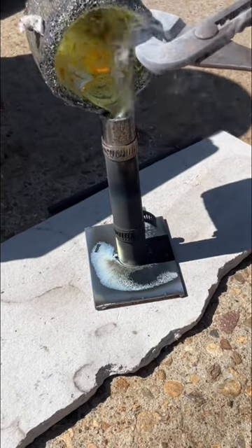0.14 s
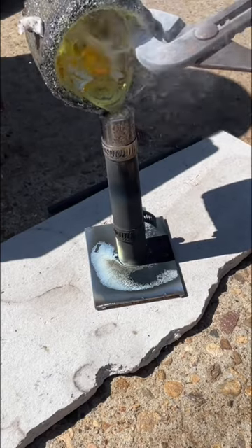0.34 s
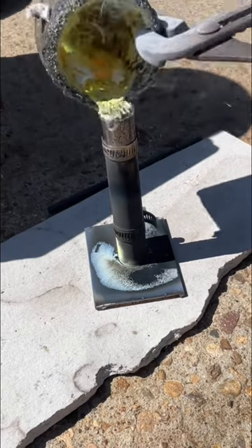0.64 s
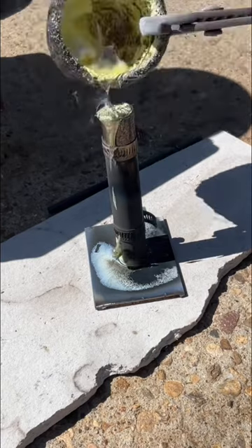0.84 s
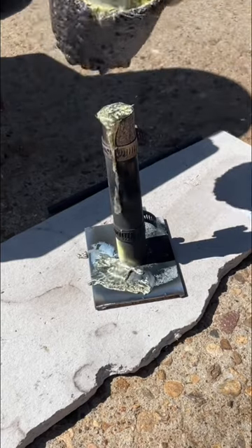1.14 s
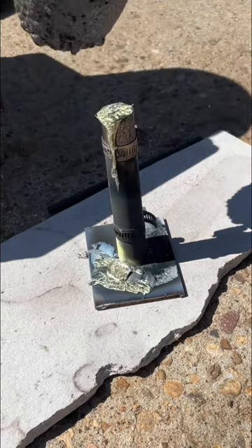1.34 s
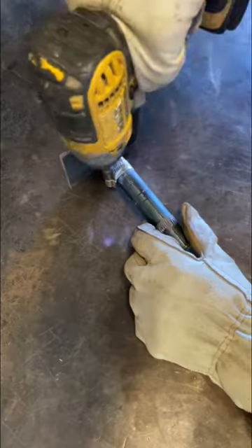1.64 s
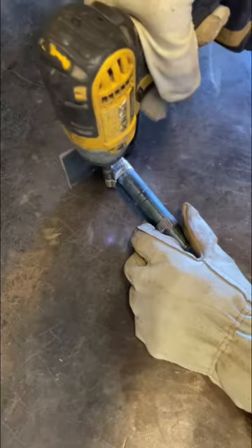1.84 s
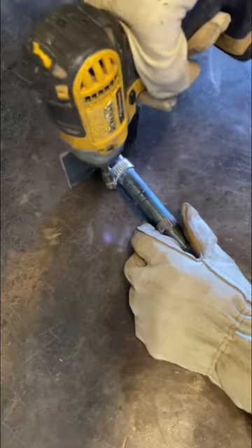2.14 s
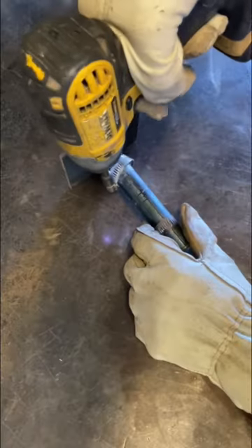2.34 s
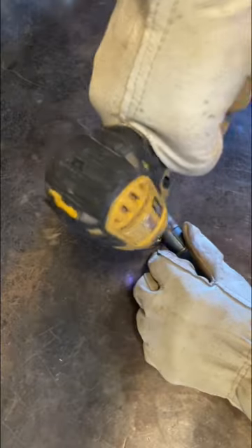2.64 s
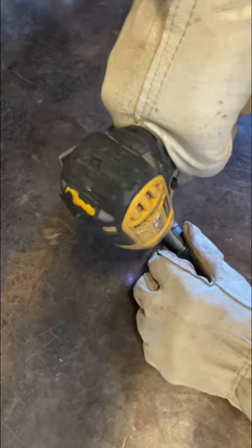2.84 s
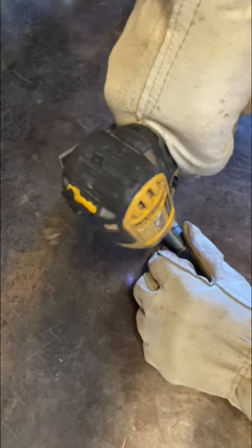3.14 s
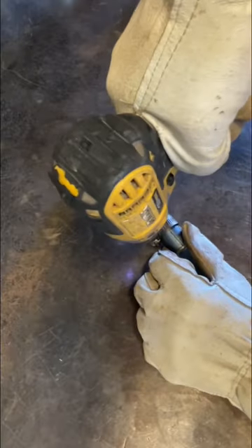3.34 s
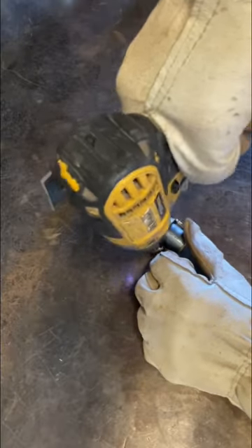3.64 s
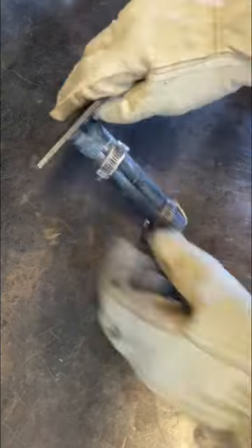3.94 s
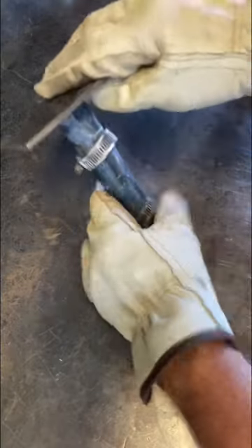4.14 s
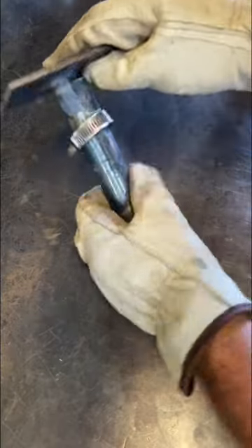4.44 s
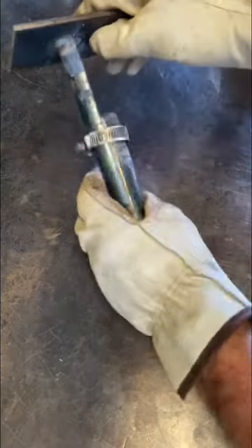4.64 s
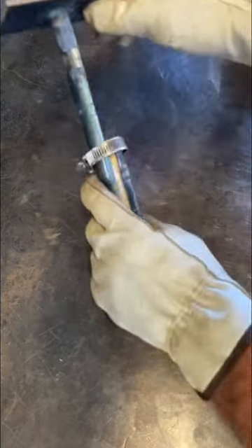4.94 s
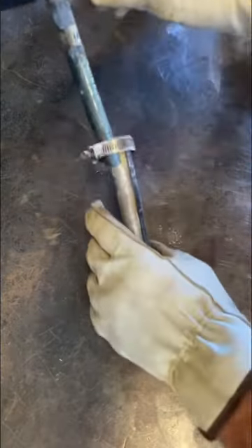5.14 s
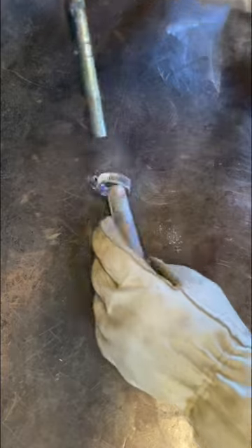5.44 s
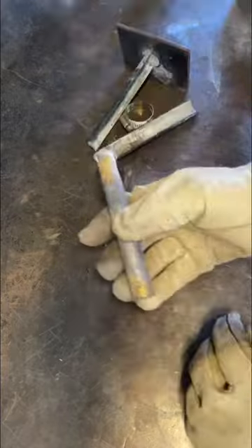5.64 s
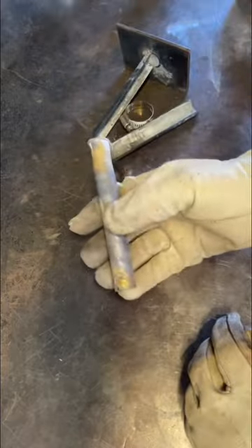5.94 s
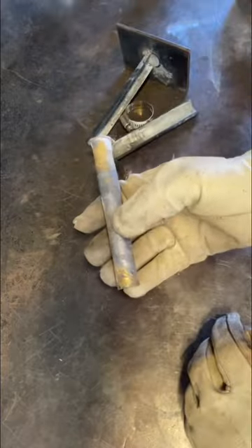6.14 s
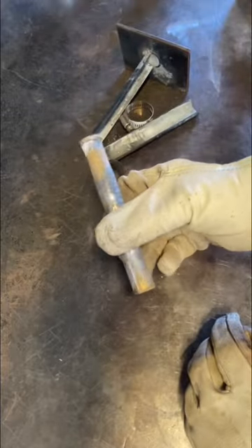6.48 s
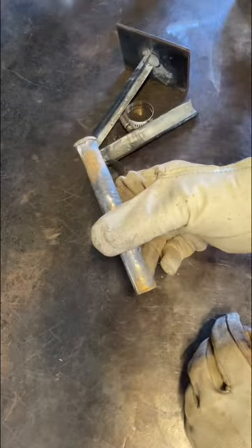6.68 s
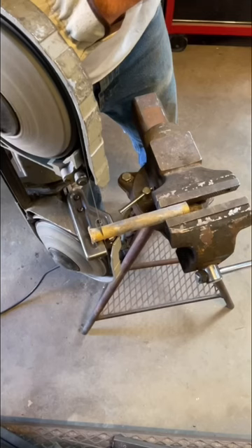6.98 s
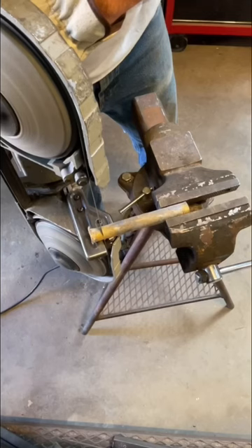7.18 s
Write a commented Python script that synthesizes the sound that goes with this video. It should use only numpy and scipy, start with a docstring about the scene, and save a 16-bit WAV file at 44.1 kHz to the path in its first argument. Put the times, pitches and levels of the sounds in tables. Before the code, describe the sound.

A quiet yard with a low beating hum and tiny metallic ticks cuts to an echoing workshop. A cordless driver whirs up and stops, steel clatters on a bench, and a second shorter driver burst follows with sharp knocks. Metal grinds, squeaks and slides apart with a heavy clank, then soft glove rustles in near quiet before a band saw cuts in loudly. Close, wide stereo microphone, no speech.

```python
"""A yard, then a workshop, in six short scenes joined by quick fades. In the yard, tongs and cooling slag tick
as dying noise puffs over a beating hum. In the workshop a cordless driver backs off two hose clamps with
wavering gear tones, a steel mould is knocked and slid off a cast bar as noise bursts and grit ring its modes,
gloves rustle as grainy noise, and a band saw runs as wide noise with tones. A two-port microphone hears bass
in both ports alike and the highest treble mostly in opposite phase."""
import sys
import numpy as np
from scipy import signal
from scipy.fft import rfft, irfft, next_fast_len
from scipy.io import wavfile
from scipy.ndimage import uniform_filter1d

SR = 44100
rng = np.random.default_rng(int(sys.argv[2]) if len(sys.argv) > 2 else 0)


def wav_out(sig):
    """Save sig, one row per channel (or a flat mono array), as 16-bit PCM at SR to the path in sys.argv[1]."""
    wavfile.write(sys.argv[1], SR, np.round(np.clip(np.atleast_2d(sig).T, -1, 1) * 32767).astype(np.int16))


N = 322371
T = np.arange(N) / SR  # time in seconds


def amp(db):
    """Turns decibels into a linear gain."""
    return 10 ** (np.asarray(db) / 20)


def evened(x):
    """Scales a signal to an rms of 1."""
    return x / np.sqrt(np.mean(x ** 2) + 1e-20)


def read(points, hz, axis=1):
    """Reads one column of a table between its points, along log frequency."""
    table = np.array(points, float)
    return np.interp(np.log(hz + 1), np.log(table[:, 0] + 1), table[:, axis])


def columns(rows):
    """Start sample and the columns of a time table at sample rate."""
    s, *rest = np.transpose(rows)
    t = T[round(s[0] * SR):round(s[-1] * SR)]
    return round(s[0] * SR), [np.interp(t, s, c) for c in rest]


def add(mix, at, sound):
    """Lays a sound into the mix from sample at, cut off at the end of the mix."""
    part = mix[at:at + len(sound)]
    part += sound[:len(part)]


def coloured(x, spectrum, band):
    """Filters x by a spectrum scaled so that white noise keeps rms 1 inside the band."""
    size = next_fast_len(x.shape[-1] + 2048)
    hz = np.fft.rfftfreq(size, 1 / SR)
    gain = amp(read(spectrum, hz))
    in_band = (hz > band[0]) * (hz < band[1])
    gain = gain / np.sqrt(np.mean(gain ** 2 * in_band))
    return irfft(rfft(x, size) * gain, size)[..., :x.shape[-1]]


def grainy(size, rough_db, grain):
    """White noise whose strength jumps about from grain to grain (grain in seconds)."""
    steps, noise = rng.standard_normal((2, -(-size // SR) * SR))
    jumps = evened(uniform_filter1d(steps, max(int(grain * SR), 1)))
    return evened(noise * amp(rough_db * jumps))[:size]


def resonate(x, hz, width):
    """Shifts the curve hz down to zero, smooths, and shifts back: a resonance of gain 1."""
    turn = np.exp(2j * np.pi * np.cumsum(hz * np.ones(len(x))) / SR)
    r = np.exp(-np.pi * width / SR)
    return 2 * (turn * signal.lfilter([1 - r], [1, -r], x / turn)).real


# The six scenes. Each row: start in seconds, fade in and fade out in seconds, echo level in dB,
# air level in dB, steady low rumble in dB, rumble centre in Hz.
SCENES = [(0, 0.013, .02, -29, -63, -90, 80), (1.512, 0.016, 0.042, -16.5, -61, -48.5, 115),
          (2.582, 0.017, 0.037, -7.5, -59, -53, 88), (3.98, 0.012, 0.035, -9.5, -53.5, -50, 78.5),
          (5.652, 0.022, 0.029, -18, -61, -57.5, 79), (6.975, 0.04, 0.00059, -12.5, -58, -59, 85)]


def scene_at(t):
    """Index of the scene that sounds at time t."""
    return np.searchsorted([row[0] for row in SCENES], t, "right") - 1


def swell(s, db, rise, fall):
    """Grows to its peak and dies away evenly in dB, inside its own scene."""
    out = np.zeros(N)
    edges = np.array([row[0] for row in SCENES] + [N / SR])
    inside = edges[scene_at(s):][:2]
    part = slice(*np.ceil(inside * SR).astype(int))
    out[part] = amp(db - 20 * np.maximum((s - T[part]) / rise, (T[part] - s) / fall))
    return out


# Colour of the yard air and of the workshop air. Each row: frequency in Hz, relative density in dB per Hz.
YARD = [(30, -12), (60, -12.5), (150, -12.5), (250, -26), (500, -29), (1000, -34.5), (2000, -42.5),
        (3000, -46), (5000, -46), (9000, -46.5), (15500, -63)]
SHOP = [(30, -11), (80, -2), (130, -11.5), (200, -15.5), (350, -17.5), (500, -13.5), (800, -7.5),
        (1100, -19), (1500, -28), (2500, -34.5), (4000, -55.5), (8000, -56), (15500, -67)]


def air():
    """Broad noise drawn apart for the two microphone paths, with the narrow layers alike in both."""
    air_db = np.transpose(SCENES)[4, scene_at(T)]
    yard = amp(air_db) * coloured(rng.standard_normal((2, N)), YARD, (300, 6000))
    shop = amp(air_db) * coloured(rng.standard_normal((2, N)), SHOP, (300, 6000))
    in_yard = T < SCENES[1][0]
    waver = 1 + 0.061 * evened(uniform_filter1d(rng.standard_normal(N), 1500))
    return np.where(in_yard, yard + hum(waver), shop + murmurs() + rumble(waver)) + buzz()


# Swell of the far hum. Each row: time in seconds, level in dB of the stronger machine.
HUM_DB = [(0, -50), (.12, -45), (.36, -40), (.62, -51), (.82, -41), (1.1, -41.5), (1.51, -43.5)]
HUM_HZ, BEAT_S, BEAT_TOP_S = 78.4, .234, .35  # centre pitch, beat period, time of one beat peak
WEAKER = .45  # strength of the second machine against the first


def hum(waver):
    """Two far machines hum a few Hz apart and beat."""
    turn = np.exp(2j * np.pi * np.cumsum(HUM_HZ * waver) / SR)
    beat = np.exp(1j * np.pi * (T - BEAT_TOP_S) / BEAT_S)
    pair = (turn * (beat + WEAKER / beat)).imag
    return amp(np.interp(T, *np.transpose(HUM_DB))) * np.sqrt(2) * pair


# A thin buzz that comes and goes. Each row: start and end in seconds, level in dB.
BUZZ = [(.05, .36, -68), (1.2, 1.62, -71), (4.0, 4.14, -71)]
BUZZ_HZ, BUZZ_FADE_S = 3880, .04


def buzz():
    """Narrow high noise faded in and out."""
    on = sum(amp(db) * np.clip(np.minimum(T - start, end - T) / BUZZ_FADE_S, 0, 1) for start, end, db in BUZZ)
    return on * evened(resonate(rng.standard_normal(N), BUZZ_HZ, 300))


# Small ticks of slag, tongs, clamp and bit. Each row: start in seconds, body level in dB, body pitch in Hz,
# bright click over body in dB.
TICKS = [(0.2763, -58, 2800, -4), (0.3974, -65, 1125, 15), (0.6065, -42, 1060, -4), (0.6275, -48, 1744, -5),
         (0.7194, -61, 1130, 4), (0.7711, -49.5, 2243, -24), (0.7844, -45, 1000, -21),
         (0.8784, -46.5, 1810, -4), (0.8924, -48, 1823, -4), (0.9009, -48.5, 1036, 5.5),
         (0.9184, -55, 1140, 7), (1.063, -45, 2433, 4.5), (1.5963, -59, 1140, -20), (1.6114, -59, 1600, 6),
         (1.6277, -46, 2070, .4), (1.6472, -37, 2270, -4), (1.9244, -61, 1240, -13),
         (1.931, -52, 2790, -11), (1.9924, -36, 3780, 3), (2.0043, -15.5, 3940, -.4),
         (2.3835, -19.5, 2180, -12), (2.5262, -59, 1310, -7), (2.6114, -49, 3930, 8.5),
         (3.0899, -45, 1185, -21), (3.1094, -59.5, 2240, 9), (3.7609, -32.5, 2140, -16),
         (4.357, -47, 1600, -20), (4.3725, -35, 1650, -13), (4.4184, -60, 1050, -6),
         (4.5974, -41.5, 2470, .1), (5.6794, -53, 1070, -11), (5.7494, -60, 1157, -14),
         (5.9788, -63, 1097, 9), (5.715, -52, 1300, -20), (6.0244, -60, 1033, -4), (6.1344, -67, 1000, 2.5),
         (6.5494, -70, 1100, .4), (6.0746, -54, 2350, -15), (6.2024, -60, 1305, -3),
         (6.7705, -64, 992, -30)]
# Colour of bright clicks and edges. Each row: frequency in Hz, relative density in dB per Hz.
SPARK = [(3000, -27), (5000, 2.5), (6500, -1), (9000, -9), (15500, -20.5)]
TICK_T60_S, CLICK_T60_S = .043, .016  # time to die by 60 dB


def ticks():
    """Each tick is a dying puff of noise around its body pitch with a bright click."""
    out, t = np.zeros(N), T[:4000]
    for (s, db, hz, bright_db), puff in zip(TICKS, rng.standard_normal((len(TICKS), 4000))):
        body = evened(resonate(resonate(puff, hz, 900), hz, 1500)) * amp(-60 * t / TICK_T60_S)
        click = evened(coloured(puff, SPARK, (4500, 8000))) * amp(bright_db - 60 * t / CLICK_T60_S)
        add(out, round(s * SR), amp(db) * (body + click))
    return out


def smear(near):
    """Short dense random smear, dying by 60 dB in 15 ms, that makes the second path differ from the first."""
    burst = rng.standard_normal(1500) * amp(-60 * T[:1500] / .015)
    return signal.oaconvolve(near, burst / np.linalg.norm(burst))[:N]


# Decay of the echo. Each row: frequency in Hz, time to die by 60 dB in seconds, relative level in dB.
ECHO = [(99.7, 1, -2.5), (503, 0.87, -2.5), (1504, 0.62, 2), (3000, 0.67, 3.5), (4530, 0.49, 5),
        (8000, 0.31, 2), (13880, 0.36, -3.5)]


def echo_tails():
    """Sparse taps of random sign, each band dying at its own speed, other taps for each path."""
    taps = np.zeros((2, SR))
    at = np.arange(200, SR - 20, 20) + rng.integers(0, 20, (2, (SR - 201) // 20))
    np.put_along_axis(taps, at, rng.choice([-1., 1.], at.shape), 1)
    hz, t, z = signal.stft(taps, SR, nperseg=256)
    early_db = -60 * t / read(ECHO, hz)[:, None]
    # a weaker, slower tail from the far end of the room takes over late
    decay = amp(early_db) + amp(0.58 * early_db - 18)
    level = amp(read(ECHO, hz, axis=2)[:, None])
    tail = signal.istft(z * level * decay, SR, nperseg=256)[1]
    return tail / np.linalg.norm(tail[0])


# Leather gloves and tongs rubbing steel. Each row: peak in seconds, level in dB,
# seconds to rise 20 dB, seconds to fall 20 dB.
RUBS = [(.62, -64, .08, .06), (.79, -66, .04, .08), (.89, -64, .03, .06), (.97, -68, .12, .06),
        (1.6, -52, .008, .01), (1.652, -54, .08, .02), (1.72, -59, .2, .33), (1.948, -53, .043, .04),
        (2.44, -48, .05, .1), (2.54, -41.5, .06, .032), (2.635, -41, .028, .02), (3.16, -54, .06, .1),
        (3.21, -44.5, .07, .03), (3.576, -44, .03, .24), (3.762, -36, .008, .015),
        (3.802, -38.5, .045, .035), (3.83, -50, .05, .2), (4.162, -55, .13, .1), (4.374, -49, .07, .015),
        (4.43, -57, .03, .06), (5.71, -64, .12, .07), (5.982, -64, .01, .008), (6.076, -67, .035, .02),
        (6.202, -72, .01, .3)]
# Colour of the rubbing. Each row: frequency in Hz, relative density in dB per Hz.
LEATHER = [(200, -25), (700, 7), (1200, -1), (2200, -1.5), (3400, -6.5), (6300, -7.5), (8500, -16),
           (15500, -21)]


def gloves():
    """Grainy friction noise under each rub."""
    strength = sum(swell(*row) for row in RUBS)
    return coloured(strength * grainy(N, 2.6, .003), LEATHER, (1500, 7000))


# Modes of the tongs. Each row: frequency in Hz, relative level in dB, time to die by 60 dB in seconds.
TONG = [(2370, -4, 0.08), (3610, -27, 0.14), (4680, -5, 0.027), (5443, -43, 0.35), (8204, -22, 0.051)]
TONG_S, TONG_DB = 1.063, -29.5


def tong_ring():
    """The tongs ring once: a handful of steel modes, each dying at its own speed."""
    out, t = np.zeros(N), T[:4000]
    ring = sum(amp(db - 60 * t / t60) * np.sin(2 * np.pi * hz * t) for hz, db, t60 in TONG)
    add(out, round(TONG_S * SR), amp(TONG_DB) * ring)
    return out


# The low rumble swells when the bench is shaken, pressed or struck. Each row: peak in seconds, level in dB,
# centre in Hz, seconds to rise 20 dB, seconds to fall 20 dB.
SWELLS = [(2.14, -32, 100, .2, .15), (2.25, -33, 115, .08, .1), (2.5, -42, 112, .1, .07),
          (2.675, -29.5, 96, .07, .12), (2.77, -37, 98, .1, .1), (2.93, -43, 98, .15, .2),
          (3.3, -40, 98, .1, .2), (3.64, -44, 86, .15, .2), (3.9, -44, 81, .3, .1), (4.1, -52, 78, .1, .1),
          (4.78, -34, 99, .13, .22), (5.08, -46, 111, .1, .15), (5.27, -39, 120, .07, .03),
          (5.345, -25, 123, .02, .08), (5.56, -29, 90, .13, .11), (6.02, -55, 78, .08, .08),
          (6.51, -53, 92, .07, .06)]


def rumble(waver):
    """A wavering drone and narrow low noise, whose centre leans toward the strongest swell."""
    low_db, low_hz = np.transpose(SCENES)[5:, scene_at(T)]
    level, weighted = amp(low_db), amp(low_db) * low_hz
    for s, db, hz, rise, fall in SWELLS:
        push = swell(s, db, rise, fall)
        level, weighted = level + push, weighted + push * hz
    hz = weighted / level
    drone = np.sin(2 * np.pi * np.cumsum(hz * waver) / SR)
    noise = evened(resonate(resonate(rng.standard_normal(N), hz, 52), hz, 90))
    return level * (0.57 * drone + .75 * noise)


# Narrow bands in the workshop air. Each row: frequency in Hz, level in dB before it drifts.
MURMURS = [(640, -76.5), (800, -75), (980, -72.5)]


def murmurs():
    """Narrow bands of the workshop air swell and fade."""
    out = np.zeros(N)
    for hz, db in MURMURS:
        slow = uniform_filter1d(uniform_filter1d(rng.standard_normal(N), 5000), 3000)
        drift = amp(4.0 * evened(slow))
        out += amp(db) * drift * evened(resonate(rng.standard_normal(N), hz, 50))
    return out


# Driver trigger half pressed. Each row: start and end in seconds, level in dB.
WHINES = [(1.983, 2.0, -44), (2.597, 2.645, -50), (3.138, 3.22, -46)]
# Partials of the controller whine. Each row: frequency in Hz, relative level in dB.
CHOP = [(3930, 0), (7860, -2), (11790, -6)]


def controller_whine():
    """The motor controller whines with steady harmonic partials."""
    out = np.zeros(N)
    for start, end, db in WHINES:
        t = T[:round((end - start) * SR)]
        whine = sum(amp(db + d) * np.sin(2 * np.pi * hz * t) for hz, d in CHOP)
        add(out, round(start * SR), whine * np.minimum(t / 0.0045, 1))
    return out


def gear_tone(hz, width, clean):
    """A steady partial on the speed curve, mixed with narrow noise around it."""
    steady = np.sqrt(2) * np.sin(2 * np.pi * np.cumsum(hz) / SR)
    rough = evened(resonate(grainy(len(hz), 2.1, 0.023), hz, width))
    return clean * steady + np.sqrt(1 - min(clean, 1) ** 2) * rough


# Driver runs. Each row: start and end in seconds, rise in seconds, time in seconds when the gears bite,
# spin-up time constant in seconds, gear noise in dB, base shaft hum in dB, base mesh tone in dB,
# clean share of the mesh tone, rattle depth in dB, change of the gear noise in dB per second.
RUNS = [(1.99, 2.45, .035, 2.012, .047, -22.5, -27, -24, .75, 1.5, -7),
        (3.215, 3.57, .008, 3.218, .055, -25, -38, -25, .35, 1.9, .1)]
# Tones along every run. Each row: share of the run, mesh tone over its base in dB, second tone in dB,
# third tone in dB, shaft hum over its base in dB.
TONES = [(0, -30, -40, -56, -18), (.08, -2.5, -31, -38, -8), (.15, -3.5, -27, -30, -3),
         (.33, -3.5, -23, -30, 0.1), (.47, -5, -28, -27, -1.5), (.62, .1, -32, -27, -3.5),
         (.8, -12, -32, -33, -4), (1, -43, -52, -59, -12)]
# Colour of the gear noise. Each row: frequency in Hz, relative density in dB per Hz.
GEARS = [(40, 0), (80, 3.7), (130, -9.5), (250, 0.2), (400, -3), (700, -2), (1200, -0.5), (2200, -2.5),
         (3400, -4.5), (4500, -2.5), (6300, 1.7), (8500, -6.5), (12000, -18), (15500, -15.5)]
# Resonances of the driver shell. Each row: frequency in Hz, width in Hz, relative level in dB.
HOUSING = [(2360, 440, -5), (3134, 200, -19.5), (4600, 250, -9), (5146, 250, -13.5), (6330, 200, -7)]
BITE_HZ, TOP_HZ = 668, 2185  # gear mesh as the gears bite and at full speed
SHAFT = 6.4  # mesh tones per turn of the motor shaft
SECOND, THIRD = 1.9, 2.68  # further gear tones as multiples of the mesh
RUN_FALL_S, COAST_DB = .06, -18  # length of the gear noise fall, and its depth at either end of a run


def driver_gears():
    """Gear noise beaten once a shaft turn, with wavering gear tones that follow the speed."""
    out = np.zeros(N)
    share, *levels = np.transpose(TONES)
    for start, end, rise, bite, spin_up, gear_db, shaft_db, tone_db, clean, rough_db, sag_db in RUNS:
        t = T[round(start * SR):round(end * SR)]
        hz = TOP_HZ - (TOP_HZ - BITE_HZ) * np.exp(-np.maximum(t - bite, 0) / spin_up)
        progress = (t - start) / (end - start)
        mesh_db, second_db, third_db, hum_db = (np.interp(progress, share, db) for db in levels)
        # 1 at either end of the run, 0 in between
        away = np.maximum(np.maximum(1 - (t - start) / rise, 1 - (end - t) / RUN_FALL_S), 0)
        turns = np.cumsum(hz / SHAFT) / SR
        beat = 1 + 0.24 * np.cos(2 * np.pi * turns)
        rattle = beat * grainy(len(hz), rough_db, .003)
        shell = sum(amp(db) * evened(resonate(rattle, f, width)) for f, width, db in HOUSING)
        gear_level = amp(gear_db + sag_db * (t - start) + COAST_DB * away)
        sound = gear_level * (coloured(rattle, GEARS, (1000, 7000)) + 0.36 * shell)
        sound += amp(tone_db + mesh_db) * gear_tone(hz, 110, clean)
        sound += amp(second_db) * gear_tone(SECOND * hz, 170, 0.4)
        sound += amp(third_db) * gear_tone(THIRD * hz, 70, .6)
        shaft = gear_tone(hz / SHAFT, 56, .4) + 0.53 * gear_tone(.72 * hz / SHAFT, 37, .3)
        sound += amp(shaft_db + hum_db) * shaft
        add(out, round(start * SR), sound * signal.windows.tukey(len(hz), .04))
    return out


# Steel on the bench. Each row: start in seconds, crack in dB, low thud over crack in dB,
# treble edge over crack in dB, length of contact in seconds (the crack falls 20 dB in it).
BLOWS = [(2.6455, -16.5, -9.5, -8, 0.034), (2.7115, -18.5, -8, -8, 0.032), (2.7899, -26, -6, -12.5, 0.0094),
         (2.8191, -40.5, 10.1, -18.5, 0.043), (3.2208, -10.5, -22, -12.5, 0.02),
         (3.2612, -10.5, -19, -4, 0.014), (3.2675, -14, -17.5, -3, 0.012),
         (3.5226, -18.5, -10.5, -19, 0.027), (3.7927, -30, .4, -34.5, 0.029), (4.7242, -15, 11, -8.5, 0.02),
         (4.7399, -15.5, -2.5, -12.5, 0.019), (5.1444, -38.5, 2.1, -6, 0.013),
         (5.1844, -37, 1.1, -10.1, 0.017), (5.2151, -29, -4, 5, 0.02), (5.228, -33.5, 7, -11.5, 0.02),
         (5.2674, -33.5, 2.5, -11.5, 0.013), (5.2853, -32.5, -7.5, -16, 0.056),
         (5.3369, -12.5, 2.1, -6.5, 0.025), (5.349, -9, 4, -9, 0.015), (5.3839, -25, -3.5, -3, 0.042)]


def blows():
    """Each blow is a crack, a faster-dying bright edge and a slower thud, all still uncoloured noise."""
    crack, edge, thud, t = *np.zeros((3, N)), T[:6000]
    for (s, db, thud_db, edge_db, contact), noise in zip(BLOWS, rng.standard_normal((len(BLOWS), 3, 6000))):
        at = round(s * SR)
        add(crack, at, noise[0] * amp(db - 20 * t / contact) * np.minimum(t / 0.00076, 1))
        add(edge, at, noise[2] * amp(db + edge_db - 25 * t / contact))
        add(thud, at, noise[1] * amp(db + thud_db - 17 * t / contact) * np.minimum(t / .003, 1))
    return crack, edge, thud


# Colours of the crack and of the bench-top thud. Each row: frequency in Hz, relative density in dB per Hz.
CRACK = [(300, -33.5), (900, 2.5), (1600, 3), (2800, 4.5), (4200, -4), (6000, -25)]
THUD = [(50, -8.5), (100, -5.5), (170, -4.5), (280, -1), (500, -3), (800, -3.5), (1200, -10.5), (2000, -31)]


def steel():
    """Blows and sliding grit take the colours of steel and bench, and ring the mould."""
    crack, edge, thud = blows()
    grit, scrape, song = slides()
    knock = coloured(crack + amp(-8.5) * grit, CRACK, (1000, 4500))
    bright = coloured(edge + amp(-10.5) * grit, SPARK, (4500, 8000))
    low = coloured(thud + scrape, THUD, (100, 800))
    ring = mould_ring(grit + amp(-14.5) * crack)
    return knock + bright + low + amp(17) * ring + song + squeaks()


# Gritty scraping and the dying noise between scrapes, one list a stretch. Each row: time in seconds,
# gritty ringing in dB and dull scrape in dB, both before colouring.
SLIDES = [
    [(4.4, -65.5, -63.5), (4.475, -60, -60), (4.522, -46, -57), (4.542, -36.5, -49), (4.566, -44.5, -44.5),
     (4.602, -35, -51), (4.62, -46, -57), (4.676, -41.5, -53), (4.716, -27.5, -43)],
    [(4.9, -49.5, -41.5), (5.05, -62, -45), (5.092, -49, -40.5), (5.135, -56, -48)],
    [(5.143, -36.5, -39.5), (5.179, -39, -30), (5.211, -38.5, -53.5), (5.235, -42.5, -28),
     (5.311, -47, -46), (5.33, -41, -37.5)],
]
# Singing mode over the grit. Each entry: level over the gritty ringing in dB, one a stretch.
SONG_DB = [3, -6, 2.5]
SONG_HZ, SONG_WIDTH = 2437, 48  # the singing mode, both in Hz


def slides():
    """Sliding friction as uneven grit and a dull scrape, with a mode near 2.4 kHz singing along."""
    grit, scrape, song = np.zeros((3, N))
    for rows, song_db in zip(SLIDES, SONG_DB):
        at, (ring_db, scrape_db) = columns(rows)
        size = len(ring_db)
        singing = evened(resonate(grainy(size, 1.5, 0.013), SONG_HZ, SONG_WIDTH))
        add(song, at, amp(ring_db + song_db) * singing)
        add(grit, at, amp(ring_db) * grainy(size, 3.0, 0.0048) * signal.windows.tukey(size, .08))
        add(scrape, at, amp(scrape_db) * grainy(size, 2.5, .01))
    return grit, scrape, song


# Modes of the mould. Each row: frequency in Hz, width in Hz, relative level in dB.
MOULD = [(1830, 50, -15.5), (3084, 41, -9), (3600, 77, -20.5), (4330, 80, -10), (6000, 70, -6),
         (6340, 44, -1.5), (7230, 50, -7), (8660, 54, 0), (9100, 50, -8), (10300, 60, -4),
         (11200, 52, -7.5)]


def mould_ring(strike):
    """The mould modes ring in the fourth scene, where the mould is free once the clamps are off."""
    free = slice(round(SCENES[3][0] * SR), round(SCENES[4][0] * SR))
    drive, ring = strike[free], np.zeros(N)
    for hz, width, db in MOULD:
        # the point of contact wanders, so each mode is excited in its own bursts
        slow = uniform_filter1d(uniform_filter1d(rng.standard_normal(2 * SR), 1200), 600)
        wander = amp(6.1 * evened(slow))[:len(drive)]
        ring[free] += amp(db) * resonate(drive * wander, hz, width)
    return ring


# Short squeaks of other modes as the halves catch. Each row: start in seconds, length in seconds,
# frequency in Hz, level in dB.
SQUEAKS = [(4.5, .06, 2950, -48), (4.57, .03, 6300, -42), (4.64, .03, 3000, -38), (5.215, .03, 4330, -41),
           (4.7, .022, 4330, -38), (4.92, .06, 5950, -48), (5.27, .03, 7230, -42), (5.28, .04, 1830, -33),
           (5.28, .045, 3300, -38)]


def squeaks():
    """Each squeak is narrow noise at one mode under a half-sine swell."""
    out, t = np.zeros(N), T[:6000]
    for (s, length, hz, db), noise in zip(SQUEAKS, rng.standard_normal((len(SQUEAKS), 6000))):
        shape = np.sin(np.pi * np.minimum(t / length, 1))
        add(out, round(s * SR), amp(db) * evened(resonate(noise, hz, 90)) * shape)
    return out


# Colour of the saw noise. Each row: frequency in Hz, relative density in dB per Hz.
SAW = [(60, -20), (130, -19), (250, -15.5), (450, -4), (700, 2.5), (1200, -1), (2200, -4), (3000, -3),
       (3700, -9), (5000, -5.5), (7000, -12), (10000, -16.5), (15500, -19)]
# Tones of the saw. Each row: frequency in Hz, level in dB.
SAW_TONES = [(720, -39), (2207, -34), (7350, -48)]
SAW_DB = -22  # level of the noise between 400 and 7000 Hz


def saw():
    """Running band saw: wide noise with a few wavering tones."""
    out, at = np.zeros(N), round(SCENES[5][0] * SR)
    noise = grainy(N - at, 0.81, 0.0046)
    tones = sum(amp(db) * evened(resonate(rng.standard_normal(SR), hz, 11))[:N - at] for hz, db in SAW_TONES)
    add(out, at, amp(SAW_DB) * coloured(noise, SAW, (400, 7000)) + tones)
    return out


def scene():
    """Each scene has its own echo level and fades at both ends; two paths feed port sum and difference."""
    near = ticks() + tong_ring() + gloves() + controller_whine() + driver_gears() + steel()
    out, tails = air(), echo_tails()
    # the smear on the second path widens the stereo
    paths = np.array([near, 0.45 * near + 1.04 * smear(near)])
    # two independent draws of the same saw noise, mixed to sound wide
    first, second = saw(), saw()
    near = near + first
    paths = paths + np.array([first, .75 * first + .65 * second])
    ends = [row[0] for row in SCENES[1:]] + [N / SR]
    for (start, rise, fall, echo_db, *_), end in zip(SCENES, ends):
        part = slice(round(start * SR), round(end * SR))
        wet = signal.fftconvolve(near[None, part], tails, axes=1)[:, :len(near[part])]
        fade = np.clip(np.minimum((T[part] - start) / rise, (end - T[part]) / fall), 0, 1)
        out[:, part] = (out[:, part] + paths[:, part] + amp(echo_db) * wet) * fade
    return out


# Port difference against port sum. Each row: frequency in Hz, level in dB, lead in radians.
PORTS = [(60, -28.5, 1.5), (200, -19, 1.5), (380, -7.5, 4.2), (700, 0.5, 0.5), (1250, -4, 1.8),
         (2400, -3, 0.62), (4400, -2.5, 2), (6500, -2, 1.2), (8350, 6.5, 0.59), (10140, 36, 1.5),
         (12040, 62, 2.7), (15000, 7, 1.3)]
EDGE_HZ = 15900  # upper band limit


def record(dry):
    """Power divides between port sum and port difference by frequency; then the band limit."""
    size = next_fast_len(N + 4096)
    hz, z = np.fft.rfftfreq(size, 1 / SR), rfft(dry, size)
    z = z * hz ** 3 / (hz ** 3 + 34 ** 3)  # the capsules lose the deepest bass
    ratio = amp(read(PORTS, hz))
    both = z[0] / np.sqrt(1 + ratio ** 2)
    apart = z[1] * ratio / np.sqrt(1 + ratio ** 2) * np.exp(1j * read(PORTS, hz, axis=2))
    pair = irfft(np.array([both + apart, both - apart]), size)[:, :N]
    pair = pair / (1 + abs(pair) ** 4) ** (1 / 4)  # the input stage rounds off the highest peaks
    band_limit = signal.firwin(1023, EDGE_HZ, window=("kaiser", 9), fs=SR)
    return signal.oaconvolve(pair, band_limit[None], "same")


dry = scene()
out = record(dry)
wav_out(out)
```